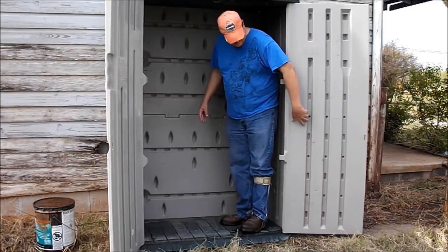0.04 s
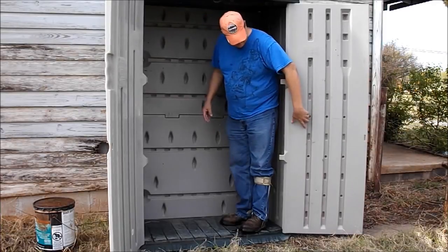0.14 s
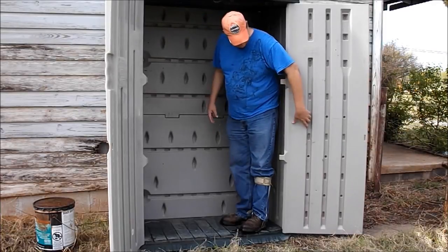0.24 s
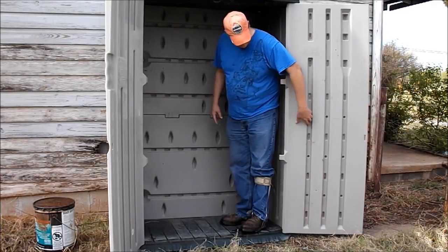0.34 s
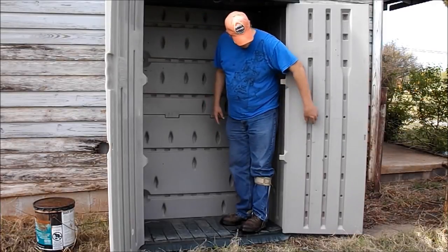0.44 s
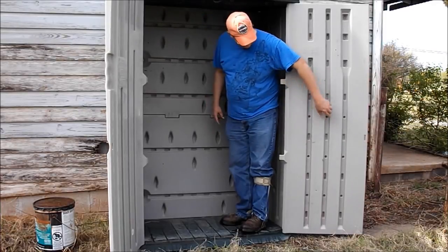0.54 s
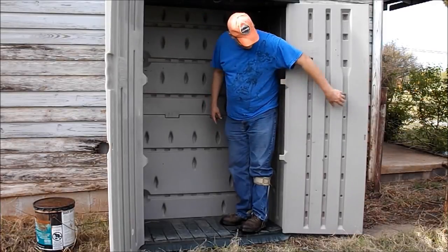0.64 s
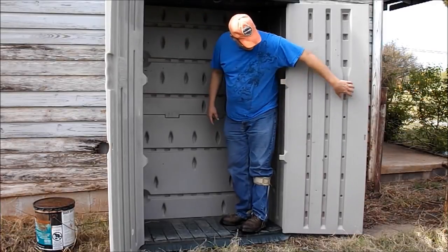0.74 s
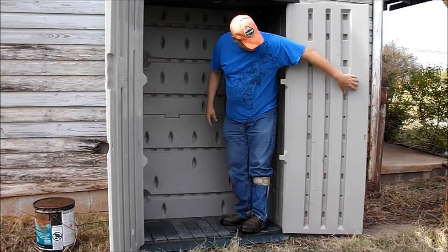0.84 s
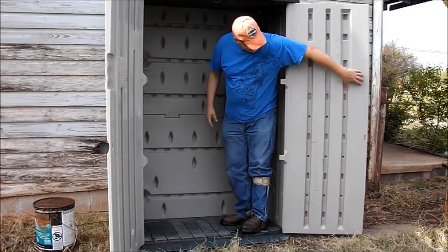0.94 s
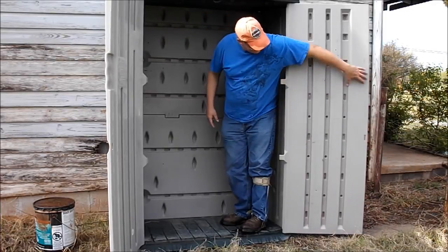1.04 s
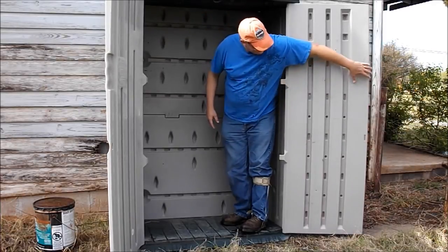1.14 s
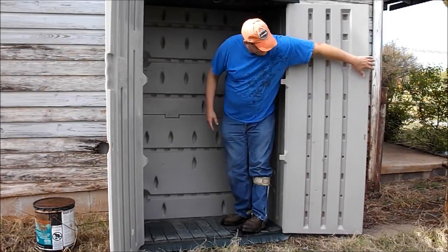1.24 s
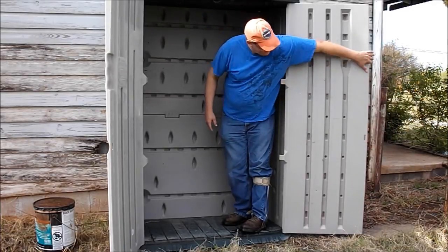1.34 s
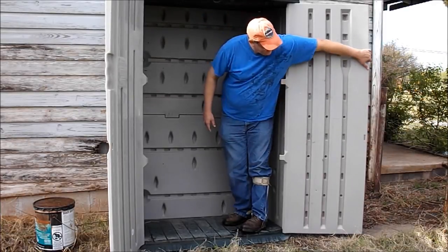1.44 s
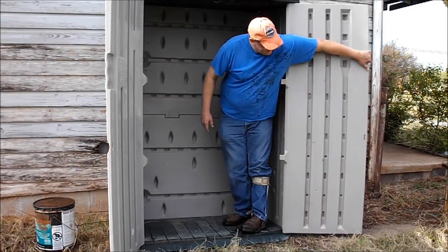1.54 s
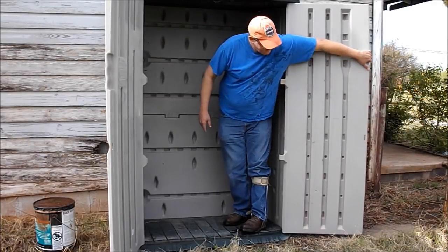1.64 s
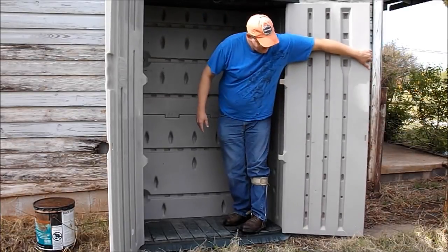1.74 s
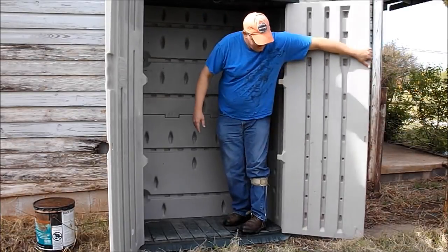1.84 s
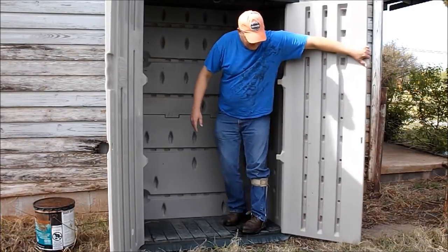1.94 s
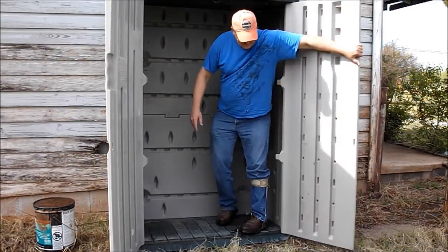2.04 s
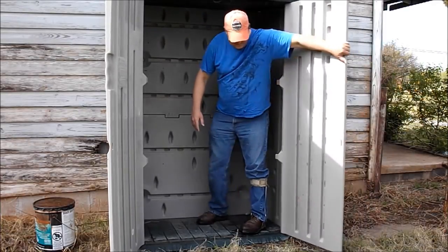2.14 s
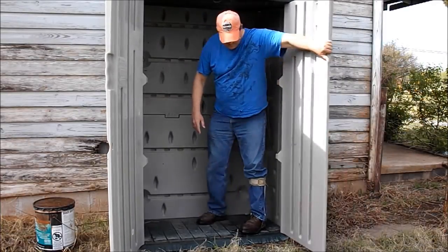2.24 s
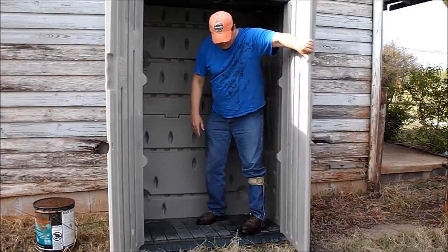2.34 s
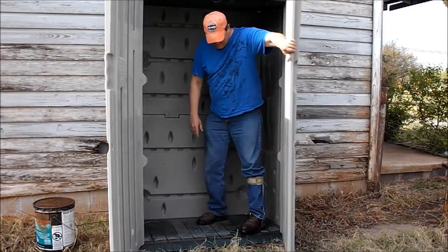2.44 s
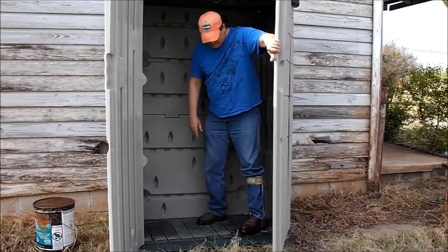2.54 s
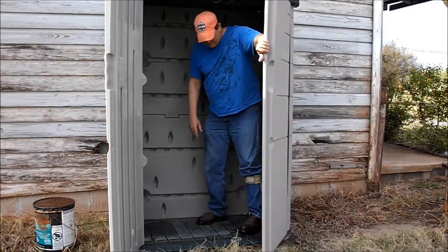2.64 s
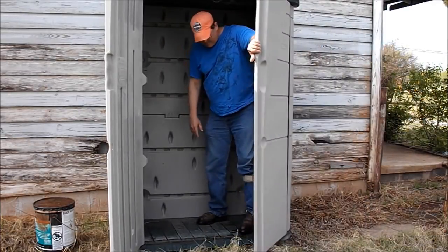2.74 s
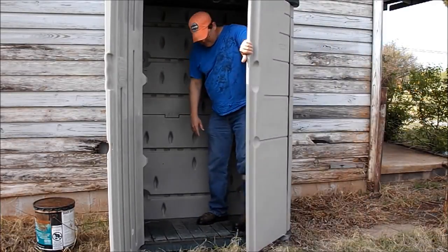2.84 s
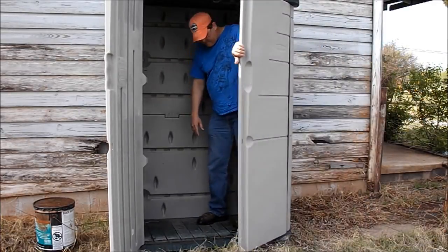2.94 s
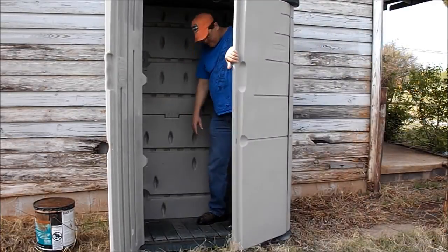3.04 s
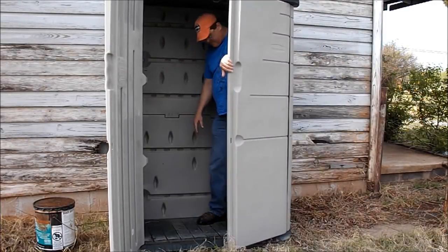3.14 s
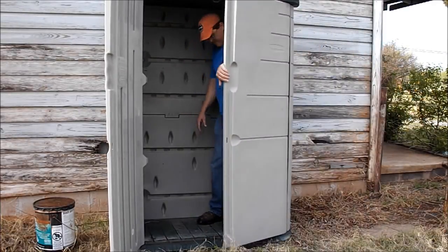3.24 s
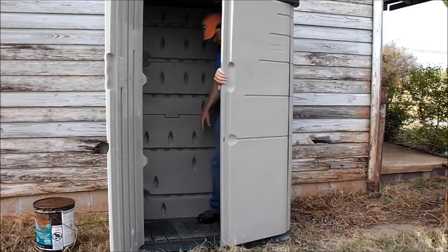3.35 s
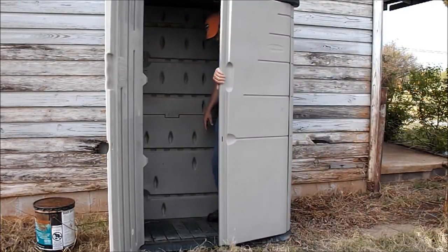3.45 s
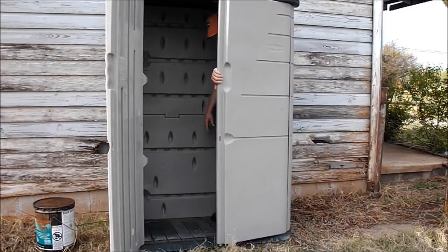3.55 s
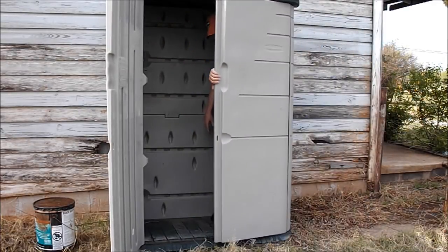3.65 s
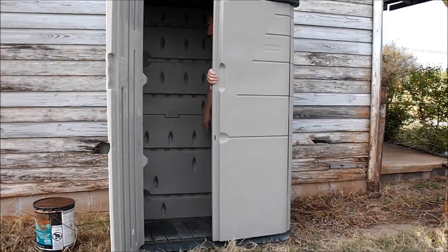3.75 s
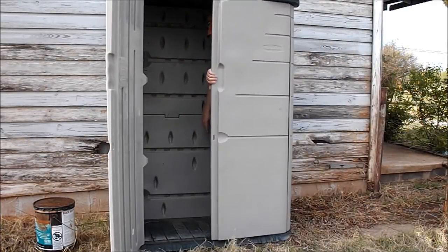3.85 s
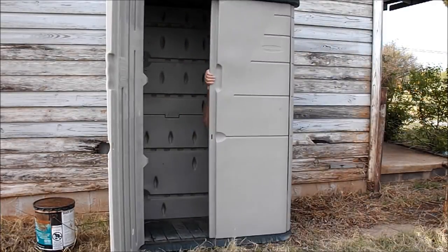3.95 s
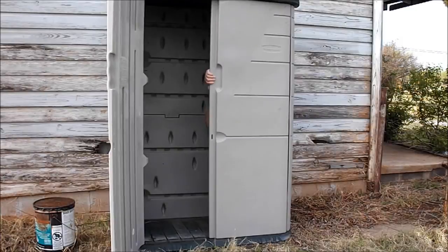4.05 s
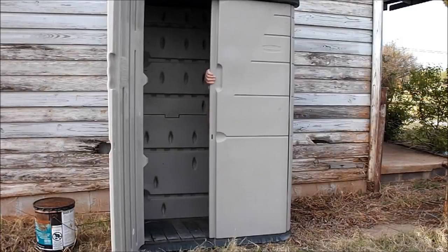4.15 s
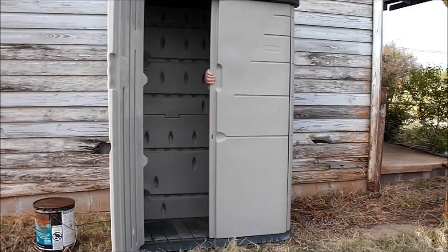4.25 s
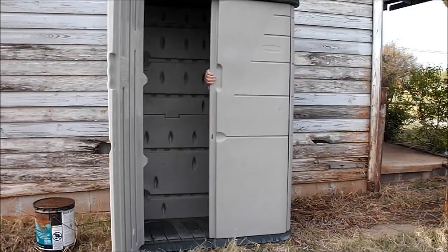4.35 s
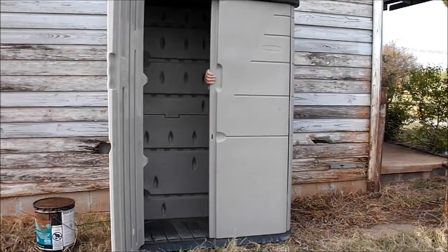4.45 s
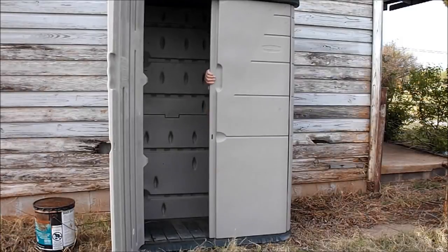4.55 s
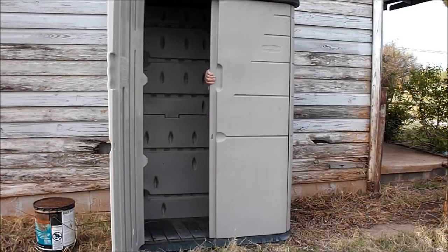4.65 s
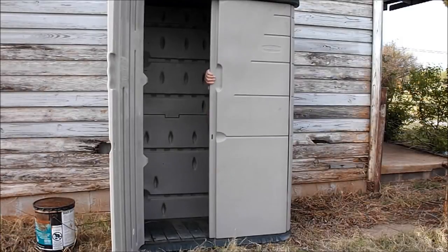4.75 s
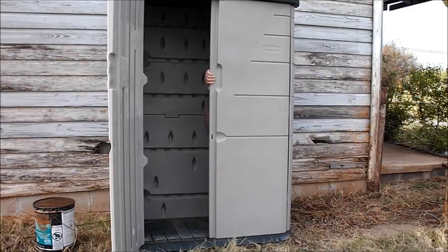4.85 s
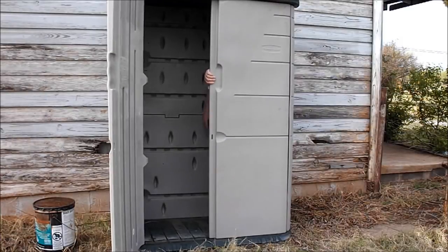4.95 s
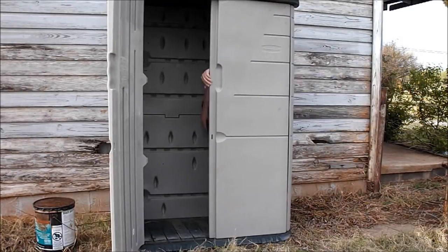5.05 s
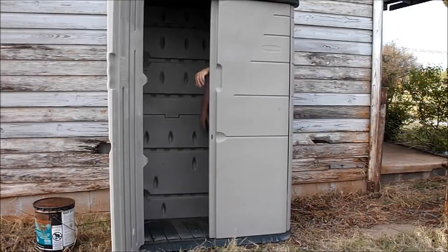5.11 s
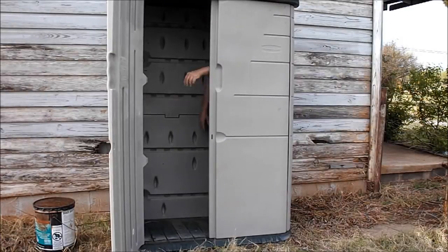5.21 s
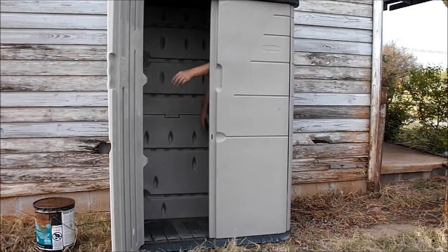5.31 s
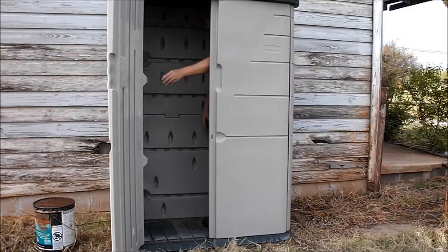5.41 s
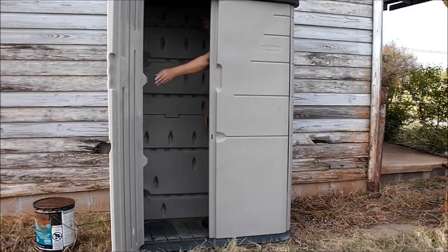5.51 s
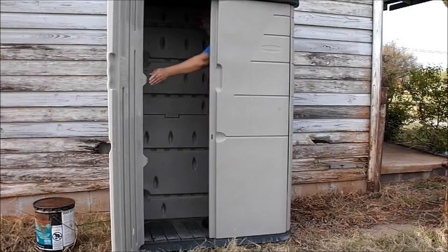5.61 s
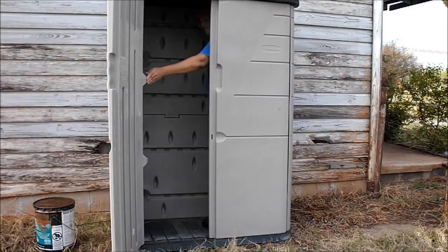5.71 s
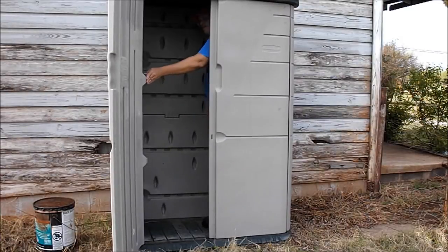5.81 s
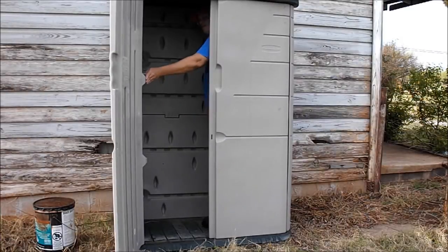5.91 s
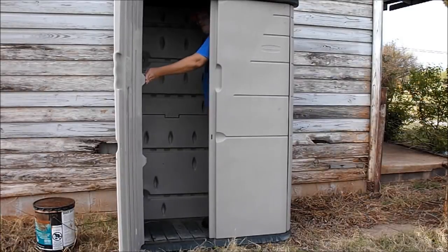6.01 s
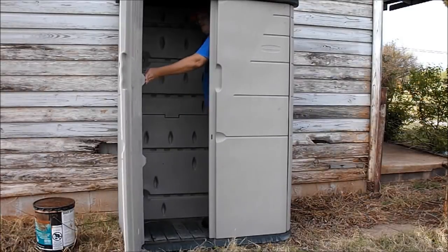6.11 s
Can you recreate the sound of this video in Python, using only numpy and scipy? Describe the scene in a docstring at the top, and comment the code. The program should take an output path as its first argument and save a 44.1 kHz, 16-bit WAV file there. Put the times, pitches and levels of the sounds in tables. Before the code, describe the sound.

Outdoors with chirping birds and faint traffic, a hollow plastic door clicks, rattles and scrapes, bangs shut, then gets a few soft knocks.

```python
"""Plastic cabinet door pulled shut outdoors

A hollow plastic door is tapped, dragged over its sill and slammed: clicks and rattles ring its panel modes,
bright grit cracks at the edges, shaped noise brushes, a hinge creaks, noise booms in the cavity resonances.
Two birds whistle in gliding sines with scattered echoes; an insect buzzes in narrow bands of pulsing noise.
Behind them lie fading traffic, leaves and wind in coloured noise, and the camera's hiss and thin whine."""
import sys
import numpy as np
from scipy import signal
from scipy.fft import rfft, irfft, next_fast_len
from scipy.io import wavfile
from scipy.ndimage import uniform_filter1d

SR = 44100
rng = np.random.default_rng(int(sys.argv[2]) if len(sys.argv) > 2 else 0)


def boost(x):
    """Linear amplitude factor 10**(x/20) for a level x in decibels (scalar or array-like)."""
    u = np.asarray(x, float) / 20
    return 10 ** u


def store_pcm(level_fs):
    """Save levels as 16-bit WAV."""
    pcm = np.round(np.clip(level_fs, -1, 1) * 32767).astype(np.int16)
    wavfile.write(sys.argv[1], SR, np.atleast_2d(pcm).T)


N = 272342

# ringing modes of the door panel: pitch_hz, level_db, t60_s
DOOR_MODES = [(68, -16, 0.15), (132, -2, 0.13), (181, -5.5, 0.032), (256.7, -1, 0.074), (300.4, -2.5, 0.08),
              (364.4, 2, 0.05), (434, -5.5, 0.055), (499, 0.5, 0.031), (579.6, -1, 0.053),
              (707, 4.5, 0.038), (798, -4.5, 0.068), (866, 1, 0.036), (955, 2.5, 0.027), (1080, 1.5, 0.013),
              (1250, -9, 0.024), (1375, -10, 0.022), (1550, -12, 0.024)]


def rms_one(x):
    """Scale to rms 1."""
    return x / np.sqrt(np.mean(x ** 2) + 1e-20)


def in_time(rows, outside=None):
    """Draw a curve of (time_s, value) points at every sample."""
    s, value = np.transpose(rows)
    return np.interp(np.arange(N) / SR, s, value, outside, outside)


def drift(rate_hz):
    """Slow random wander of spread 1: noise through two one-pole low-passes, made at every 40th sample."""
    pole = np.exp(-2 * np.pi * rate_hz * 40 / SR)
    noise = rng.standard_normal(N // 40 + 2002)
    slow = signal.lfilter([1], [1, -2 * pole, pole ** 2], noise)[2000:]
    return np.interp(np.arange(N) / 40, np.arange(len(slow)), rms_one(slow))


def coloured(spectrum, patchy_db):
    """Noise of rms 1 with the given spectrum, its four pitch zones flickering independently."""
    size = next_fast_len(N)
    hz = np.arange(1, size // 2 + 2) * SR / size
    point_hz, point_db = np.transpose(spectrum)
    curve_db = np.interp(np.log(hz), np.log(point_hz), point_db, -150, -150)
    shaped = rfft(rng.standard_normal(size)) * boost(curve_db)
    edges = np.geomspace(point_hz[0], point_hz[-1], 5)
    total = 0
    for low, high in zip(edges, edges[1:]):
        zone = irfft(shaped * (hz >= low) * (hz < high), size)[:N]
        total = total + zone * boost(patchy_db * drift(8.0))
    return rms_one(total)


def ring(push, hz, t60):
    """Two-pole resonator: a unit click sets a dying sine of height 1 ringing."""
    r, w = boost(-60 / (t60 * SR)), 2 * np.pi * hz / SR
    return signal.lfilter([0, np.sin(w)], [1, -2 * r * np.cos(w), r * r], push + 1e-18)


def soften(x, cut_hz):
    """A soft contact is a low-passed click."""
    return signal.lfilter(*signal.butter(3, np.clip(cut_hz, 100, 18000), fs=SR), x)


def mode_gain(hz, level_db, weight_db):
    """Heavy contacts move the whole panel, fingertips ring mostly its upper modes."""
    panel_hz = 460   # the weight acts mostly below this
    return boost(level_db + weight_db / (1 + (hz / panel_hz) ** 4))


def stroke(spans):
    """Gain of a rub that sounds only within its spans of (time_s, level_db), with soft ends."""
    return uniform_filter1d(sum(boost(in_time(rows, outside=-150)) for rows in spans), size=130)


def glide(notes):
    """Sines following paths of (time_s, pitch_hz, level_db), with soft ends."""
    out = np.zeros(N)
    for note in notes:
        s, hz, db = np.transpose(note)
        at = np.arange(round(s[0] * SR), min(round(s[-1] * SR), N))
        pitch = uniform_filter1d(np.interp(at / SR, s, hz), size=140, mode="nearest")
        ends = np.clip(np.minimum(at - at[0], at[-1] - at) / (.003 * SR), 0, 1)   # 3 ms ramps
        tone = np.sin(2 * np.pi * np.cumsum(pitch) / SR)
        out[at] += np.sqrt(2) * boost(np.interp(at / SR, s, db)) * ends * tone
    return out


def camera():
    """Steady hiss and a cluster of thin motor tones."""
    # hiss spectrum: freq_hz, relative level_db (per Hz)
    hiss_colour = [(3240, -7), (5500, -10.5), (7620, -8), (8320, -8), (9130, -7), (9250, -5), (9880, -1),
                   (10100, -4), (11100, 3.5), (12800, -8), (15800, -12)]
    # motor tones: pitch_hz, level_db (rms)
    whine_tones = [(9453, -77), (9523, -62.5), (9561, -79), (9598, -74)]
    t = np.arange(N) / SR
    whine = sum(np.sqrt(2) * boost(db) * np.sin(2 * np.pi * (hz * t + rng.random())) for hz, db in whine_tones)
    return boost(-53.5) * coloured(hiss_colour, patchy_db=1.0) + whine


def wind():
    """Gusts on the microphone are deep noise that swells and sinks."""
    # gust strength: time_s, level_db
    gusts = [(0, -39), (1.4, -50), (2, -49), (3.2, -57), (4.5, -42), (5.2, -48), (6.18, -49.5)]
    # gust spectrum: freq_hz, relative level_db (per Hz)
    wind_colour = [(14, -11), (25, -3.5), (45, -0.5), (70, 0), (120, -9)]
    return boost(in_time(gusts)) * coloured(wind_colour, patchy_db=1.0)


def traffic():
    """Far traffic fades: a low rumble and a tyre roar that follows most of its level in dB."""
    # rumble strength: time_s, level_db
    fade = [(0, -38.5), (.43, -36.5), (1.4, -40), (2, -40), (2.6, -42), (3.2, -43.5), (4.6, -47),
            (5.2, -46), (6.18, -49)]
    # rumble and roar spectra: freq_hz, relative level_db (per Hz)
    rumble_colour = [(12, -38), (20, -3.5), (92, 2.5), (130, -1), (173, 0.5), (226, -5.5), (357, -5.5),
                     (431, -12.5), (500, -12), (650, -24), (1100, -120)]
    roar_colour = [(240, -1), (400, 0), (477, -27), (528, -2.5), (745, 1.5), (1620, -12), (1900, -20.5),
                   (2300, -37.5), (2990, -22), (5060, -120)]
    rumble_db = in_time(fade)
    roar_db = -46.5 + 0.92 * (rumble_db - rumble_db[0])
    rumble = boost(rumble_db) * coloured(rumble_colour, patchy_db=1.23)
    return rumble + boost(roar_db) * coloured(roar_colour, patchy_db=0.1)


def leaves():
    """Leaves and far twitter blur into a soft noise around the microphone's presence peak."""
    # rustle strength: time_s, level_db
    rustle = [(0, -52.5), (1.1, -57.5), (2.1, -55.5), (2.6, -59.5), (5.2, -59.5), (6.18, -63.5)]
    # rustle spectrum: freq_hz, relative level_db (per Hz)
    leaf_colour = [(1180, -22), (2000, -7), (2350, -6.5), (3120, 0.5), (4230, -11.5), (4950, -10.5),
                   (5410, -28.5), (6140, -13), (7000, -32), (9100, -38), (15400, -120)]
    return boost(in_time(rustle)) * coloured(leaf_colour, patchy_db=.5)


def insect():
    """Bouts of fast wing strokes: noise pulsing at 165 Hz, heard through narrow bands as a buzz."""
    # bouts of buzzing: start_s, end_s, level_db (of the bout, ahead of the band levels)
    bouts = [(0.103, .55, -68.5), (1.142, 1.455, -64.5), (2.267, 2.63, -66.5), (3.14, 3.3, -64),
             (4.14, 4.5, -67), (5.14, 5.46, -67)]
    # bands of the buzz: pitch_hz, width_hz, level_db (relative)
    wing_bands = [(4820, 330, -9), (6190, 200, -1), (7450, 120, 0), (8750, 200, 2), (14600, 500, -1)]
    gain = stroke([[(start, db), (end - .04, db), (end, db - 3)] for start, end, db in bouts])
    pulse = 1 + .5 * np.sin(2 * np.pi * 165 * np.arange(N) / SR)
    strokes = rng.standard_normal(N) * pulse
    return gain * sum(boost(db) * rms_one(ring(strokes, hz, 2.0 / width_hz)) for hz, width_hz, db in wing_bands)


def bird(notes, echo_db):
    """Slightly hoarse whistled notes and their scattered echoes off walls and bushes."""
    decay_s, first_echo_s, echoes_per_s, hoarse_db = 0.02, 0.012, 400, 2.5
    t = np.arange(SR // 4) / SR
    echoes = rng.standard_normal(len(t)) * (rng.random(len(t)) < echoes_per_s / SR)
    yard = echoes * np.exp(-t / decay_s) * (t > first_echo_s)
    yard /= np.linalg.norm(yard)
    song = glide(notes) * boost(hoarse_db * drift(80.0))
    return song + boost(echo_db) * signal.fftconvolve(song, yard)[:N]


def twitter():
    """High bird: each chirp flicks up to its top, then slides down."""
    # chirps: start_s, length_s, top_hz, end_hz, level_db (rms at the top)
    chirps = [(1.472, .035, 7450, 6800, -60), (1.515, .045, 7960, 6800, -53),
              (1.556, 0.031, 7650, 6860, -51), (1.61, 0.035, 7950, 6800, -52.5),
              (1.655, 0.033, 7350, 6600, -55), (1.858, .028, 7550, 6700, -58),
              (1.898, 0.033, 7950, 6840, -56), (1.943, 0.044, 7450, 6500, -56),
              (1.994, 0.025, 7850, 6950, -55)]
    notes = []
    for s, length, top_hz, end_hz, db in chirps:
        notes.append([(s, top_hz - 500, db),
                      (s + .008, top_hz, db),
                      (s + 0.62 * length, (top_hz + 2 * end_hz) / 3, db),
                      (s + length, end_hz, db - 6)])
    return bird(notes, echo_db=-12)


def warble():
    """Sliding and arched whistles; each swells, fades and is strongest where it nears the best pitch."""
    # sliding notes: start_s, length_s, first_hz, last_hz, level_db (rms at the loudest point),
    # bend (exponent of the slide: under 1 slides early, over 1 late)
    slides = [(1.09, 0.19, 3190, 2990, -59, .6), (1.36, 0.047, 4700, 2900, -50, 1.3),
              (1.7, 0.067, 3600, 3120, -55, 0.84), (1.79, 0.023, 3400, 3350, -52.5, 1.1),
              (1.974, 0.043, 4110, 4040, -53, 1.2), (2.034, 0.028, 4400, 2900, -45, 1.1),
              (2.225, .03, 3250, 3180, -55, 0.91), (2.285, 0.047, 4320, 3990, -56.5, 1),
              (2.389, .09, 2850, 2370, -60, .6), (2.46, 0.046, 4120, 2960, -52, 3.4),
              (2.507, 0.026, 3970, 3560, -58, 1.5), (2.656, 0.15, 2760, 3350, -50.5, 0.42),
              (2.86, 0.019, 3320, 2880, -49, 1.1), (2.89, 0.011, 3150, 2830, -51.5, 1.1),
              (3.164, 0.027, 3540, 2740, -46.5, .9), (3.186, 0.037, 2785, 2720, -49, 1.5),
              (3.675, 0.022, 4120, 4120, -53.5, 1.1), (3.705, 0.054, 4170, 2500, -42.5, 1.2),
              (3.954, .06, 3910, 2740, -39, 1.8), (4.165, .025, 3250, 3840, -55, 1.3),
              (4.19, 0.037, 3820, 3700, -51.5, 1.1), (4.225, .03, 3780, 4680, -57, 0.48),
              (4.255, 0.031, 4700, 2780, -38, 1.14), (4.288, 0.049, 3670, 2410, -41.5, .7),
              (4.435, 0.04, 3420, 2770, -42, .7), (4.495, 0.062, 2650, 2350, -57, 2),
              (4.64, .012, 3780, 3840, -53, 1.3), (4.652, 0.02, 2750, 3120, -41.5, 0.25),
              (4.859, 0.021, 3870, 3980, -55, 1.1), (4.947, 0.022, 4330, 2720, -44.5, 0.98),
              (4.975, 0.061, 3080, 3180, -53, 1.2), (5.018, 0.032, 3260, 4130, -49, 0.34),
              (5.043, 0.038, 3990, 3600, -47, 0.61), (5.078, 0.029, 3650, 3820, -48.5, 1.3),
              (5.052, 0.027, 2320, 3320, -50, .8), (5.145, .03, 4000, 2690, -50.5, 0.99),
              (5.205, 0.056, 3230, 2480, -49, 0.43), (5.34, .025, 2500, 2950, -51.5, 0.64),
              (5.378, 0.031, 3950, 2790, -44.5, 1.6), (5.425, .04, 3700, 2380, -45.5, 0.92),
              (5.605, 0.032, 3900, 3830, -60, 1.1), (5.618, 0.017, 2300, 3000, -55, 0.77),
              (5.93, .012, 2350, 2870, -58, 0.93), (5.635, 0.035, 2400, 3100, -50.5, .5),
              (5.785, 0.018, 2900, 3210, -55.5, 1.1), (5.81, 0.067, 3950, 3570, -53.5, .6),
              (5.95, 0.018, 2580, 3030, -52.5, 1.1), (6.06, 0.058, 4850, 4240, -57, 0.55),
              (6.1, 0.034, 4130, 3830, -49, 1.5)]
    # arched notes, a rise to a sharp turn and a fall: turn_s, rise_s, first_hz, top_hz, level_db (as above)
    arches = [(3.35, 0.046, 2850, 3780, -45.5), (3.555, 0.11, 2660, 3600, -41),
              (4.716, 0.019, 3290, 3635, -39.5)]
    fall_hz_per_s, lowest_hz, rise_db, turn_exponent = 29200, 2400, -5.5, 0.98
    best_hz, off_pitch_db_per_oct, ends_db = 2950, 39.5, -7
    u = np.linspace(0, 1, num=17)
    v = 2 * u - 1   # -1 at the start, 0 in the middle, 1 at the end
    paths = []
    for s, length, first_hz, last_hz, db, bend in slides:
        paths.append((s + length * u, first_hz + (last_hz - first_hz) * u ** bend, db, 0))
    for s, rise_s, first_hz, top_hz, db in arches:
        fall_s = (top_hz - lowest_hz) / fall_hz_per_s
        depth_hz = np.where(v < 0, top_hz - first_hz, top_hz - lowest_hz)
        hz = top_hz - depth_hz * np.abs(v) ** turn_exponent
        paths.append((s + v * np.where(v < 0, rise_s, fall_s), hz, db, rise_db * (v < 0)))
    notes = []
    for s, hz, db, weak_db in paths:
        off_pitch_oct = np.abs(np.log2(hz / best_hz))
        shape_db = weak_db + ends_db * v ** 4 - off_pitch_db_per_oct * off_pitch_oct
        notes.append(np.transpose([s, hz, db + shape_db - shape_db.max()]))
    return bird(notes, echo_db=-11.5)


def brush():
    """Dry grass and sill brushed by the door edge: grainy strokes, short ones set in faster, all trail off."""
    # strokes: start_s, end_s, start_level_db, end_level_db
    strokes = [(2.743, 3.038, -50, -53.5), (3.056, 3.248, -55, -55), (3.401, 3.446, -34.5, -34.5),
               (3.68, 3.864, -51.5, -51), (3.876, 3.91, -45.5, -40), (5.71, 5.77, -54, -53)]
    # brushing spectrum: freq_hz, relative level_db (per Hz)
    brush_colour = [(590, -25), (1000, 4), (1480, -13.5), (1600, -5), (2230, -9.5), (3830, -2), (6190, -10),
                    (7700, -18), (10300, -10.5), (15500, -23.5)]
    onset_share, trail_s, faint_db, grain_db = 0.16, 0.053, -19, 1.5   # onset as a share of the length
    spans = []
    for start, end, start_db, end_db in strokes:
        spans.append([(start - onset_share * (end - start), start_db + faint_db),
                      (start, start_db),
                      (end, end_db),
                      (end + trail_s, end_db + faint_db)])
    return stroke(spans) * boost(grain_db * drift(45.0)) * coloured(brush_colour, patchy_db=2.6)


def creak():
    """A hinge slip is a short falling tone, roughened by uneven grip."""
    # path of the slip: time_s, pitch_hz, level_db (rms before roughening)
    slip = [(2.835, 750, -45), (2.852, 680, -34.5), (2.87, 620, -46)]
    return glide([slip]) * boost(6.1 * drift(82))


def boom():
    """Noise from the flexing walls in the narrow resonances of the hollow cabinet."""
    # strength of the lowest resonance: time_s, level_db
    low_boom = [(3.3, -46), (3.46, -36.5), (3.66, -49), (3.75, -32.5), (4.1, -30.5), (4.3, -37),
                (4.75, -38.5), (4.93, -40.5), (5.15, -49)]
    # strength of the upper resonances: time_s, level_db
    upper_hum = [(3.3, -63), (4.18, -64), (4.26, -47), (4.34, -59), (4.42, -51), (4.68, -46), (4.76, -65),
                 (4.84, -52), (4.95, -70.5)]
    # cavity resonances: pitch_hz, width_hz, level_db (added to the curve above)
    cavity = [(64.5, 4.3, -0.5), (355.4, 1.9, -1), (724, 15, -14)]
    # the panel wobbles around the slam's end and the low boom throbs with it, most at flex_at_s
    flex_hz, flex_at_s, flex_db, flex_dies_s = 6.06, 4.1, 3.5, 0.33
    t = np.arange(N) / SR - flex_at_s
    throb_db = flex_db * np.cos(2 * np.pi * flex_hz * t) * np.exp(-np.abs(t) / flex_dies_s)
    boom_db = in_time(low_boom, outside=-120) + throb_db
    hum_db = in_time(upper_hum, outside=-120)
    out = 0
    for hz, width_hz, level_db in cavity:
        tone = ring(rng.standard_normal(N), hz, 2.2 / width_hz)
        tone /= np.sqrt(uniform_filter1d(tone ** 2, 4000))   # even out the noise's own swells
        out = out + boost(level_db + (boom_db if hz < 200 else hum_db)) * tone
    return out


def drag():
    """Uneven stick-slip clicks of the door edge keep the panel modes sounding."""
    # the rub, harder as the door nears its frame, one list a span: time_s, level_db
    rub = [
        [(2.7, -50), (2.9, -43), (3.1, -42), (3.35, -46), (3.5, -38.5), (3.58, -33), (3.7, -30), (3.82, -26.5),
         (3.95, -19), (4.0, -28), (4.06, -24.5), (4.2, -75)],
    ]
    slips_per_s, cut_hz, weight_db = 900, 700, 12.5
    sizes = boost(1.7 * np.minimum(rng.exponential(1, N), 5))
    slips = sizes * rng.choice([-1, 1], N) * (rng.random(N) < slips_per_s / SR)
    push = soften(slips, cut_hz)
    sound = sum(mode_gain(hz, db, weight_db) * ring(push, hz, t60) for hz, db, t60 in DOOR_MODES[2:])
    sound /= np.sqrt(uniform_filter1d(sound ** 2, 3000))   # a steady pull evens the level
    return stroke(rub) * boost(1.64 * drift(12.0)) * sound   # the edge catches and lets go


def snaps():
    """Hard plastic edges meet: a crack of bright grit with a weaker tail."""
    # cracks: start_s, level_db (before the onset ramp), tail_s (decay constant)
    cracks = [(0.487, -38, .002), (0.885, -21.5, 0.0047), (0.8885, -27.5, 0.021), (2.096, -29, 0.0048),
              (2.098, -21.5, 0.019), (3.397, -31, 0.025), (3.795, -43, 0.019), (3.916, -18, 0.0051),
              (3.92, -19.5, 0.0093), (3.926, -34, .01), (3.934, -23.5, 0.0046), (4.02, -41, 0.0057),
              (4.024, -31.5, .0073), (5.347, -51, .015)]
    # crack spectrum: freq_hz, relative level_db (per Hz)
    crack_colour = [(1500, 8), (2200, -9.5), (2900, 8), (3600, -7.5), (4600, -0.5), (6200, -10),
                    (8000, -19), (11000, -15.5), (15500, -33)]
    decay_s, rise_s, tail_db = 0.0012, 0.00037, -11.5
    gain, t = np.zeros(N + SR), np.arange(SR // 4) / SR
    for s, db, tail_s in cracks:
        snap = np.exp(-t / decay_s) + boost(tail_db) * np.exp(-t / tail_s)
        gain[round(s * SR):][:len(t)] += boost(db) * snap * (1 - np.exp(-t / rise_s))
    return gain[:N] * coloured(crack_colour, patchy_db=0.5)


def blows():
    """Each blow is a click and a dying rattle of loose plastic rung through the door modes."""
    # blows: start_s, level_db (peak), hardness_oct (contact cut-off in octaves above 500 Hz),
    # weight_db (push on the low panel modes), rattle_s (decay constant)
    hits = [(0.885, -18.5, 7, -14, 0.0045), (0.8888, -9.5, 1.26, -45, 0.0097), (2.096, -20, 0, -19, 0.0046),
            (2.098, -13, 0.9, -41, 0.016), (3.397, -17, 2.5, -6, 0.018), (3.492, -19.5, 0.5, 13, 0.015),
            (3.569, -22, 1, 24, 0.0093), (3.636, -21, 1.2, 17, 0.016), (3.732, -23, 1.7, -3, 0.027),
            (3.797, -26.5, 1.5, -4, 0.045), (3.915, 0, 4, 11, 0.0055), (3.918, -1, 2, 11, 0.014),
            (3.926, -6, 0.27, -7.5, 0.0086), (3.935, -5, 0.2, 10, 0.007), (3.983, -15.5, 1, 28, 0.01),
            (4.023, -16, 0.5, 4, 0.0088), (4.035, -13, 1, 18, 0.0093), (4.086, -21, -2.5, 17, 0.0098),
            (5.298, -31, 0.5, 6, 0.02), (5.325, -38.5, 0.8, 3, 0.012), (5.374, -32, 0.2, -8, 0.015),
            (5.84, -40, 0.6, -3, 0.012), (5.351, -23.5, 2, 1, 0.021), (5.723, -26, -0.4, -5, 0.017),
            (5.731, -28, 0.2, -9, 0.023), (5.802, -34.5, 1.2, 2, 0.031)]
    out, size = np.zeros(N + SR), SR // 4
    t = np.arange(size) / SR
    for s, db, hardness, weight_db, rattle_s in hits:
        at = round(s * SR)
        grains = rng.standard_normal(size) * (rng.random(size) < 2500 / SR)   # 2500 per second
        rattle = 0.48 * grains * np.exp(-t / rattle_s)
        rattle[0] = np.clip(0.96 * hardness, .2, 3)   # a softer push leads with a weaker click
        push = soften(rattle, 500 * 2 ** hardness)
        chance_db = rng.normal(0, 1.03, len(DOOR_MODES))   # no two blows excite the modes alike
        sound = np.zeros(size)
        for (hz, level_db, t60), extra_db in zip(DOOR_MODES, chance_db):
            sound += mode_gain(hz, level_db + extra_db, weight_db) * ring(push, hz, t60)
        out[at:at + size] += boost(db) * sound / np.max(np.abs(sound))
    return out[:N]


def scene():
    """One sound field at two close ports: the left lags, and a little hiss is opposite in the two."""
    # spectrum of the opposed hiss: freq_hz, relative level_db (per Hz)
    side_colour = [(880, -48), (1500, -38), (2140, -16), (2960, -2), (5440, -7), (11200, 4), (15800, -13)]
    lag_samples = 1
    background = camera() + wind() + traffic() + leaves() + insect() + twitter() + warble()
    door = brush() + creak() + boom() + drag() + snaps() + blows()
    size = next_fast_len(N)
    spectrum = rfft(background + door, size)
    half_lag = np.exp(-1j * np.pi * np.fft.rfftfreq(size) * lag_samples)   # half late, half early
    left = irfft(spectrum * half_lag, size)[:N]
    right = irfft(spectrum * half_lag.conj(), size)[:N]
    unlike = boost(-63) * coloured(side_colour, patchy_db=2.0)
    return np.array([left + unlike, right - unlike])


def low_pass(x):
    """Removes everything above the highest recorded frequency."""
    return signal.sosfilt(signal.butter(12, 15910, fs=SR, output="sos"), x)


def record(dry):
    """The deepest bass is cut, the stereo difference fades below 620 Hz, the loudest peaks are rounded."""
    low_cut_hz, mono_hz, top = 25, 620, 0.99
    mid = signal.lfilter(*signal.butter(1, low_cut_hz, "high", fs=SR), dry.mean(axis=0))
    side = signal.filtfilt(*signal.butter(1, mono_hz, "high", fs=SR), (dry[0] - dry[1]) / 2)
    both = np.array([mid + side, mid - side])
    return low_pass(top * np.tanh(both / top))


dry = scene()
out = record(dry)
store_pcm(out)
```